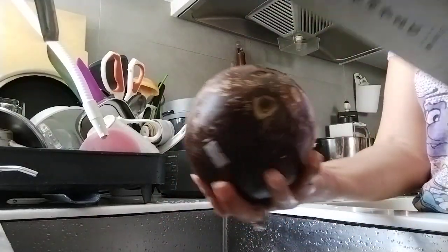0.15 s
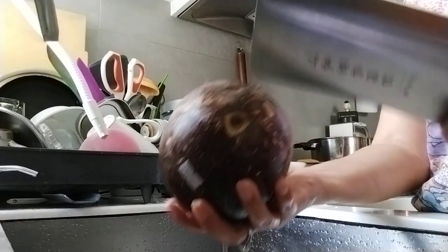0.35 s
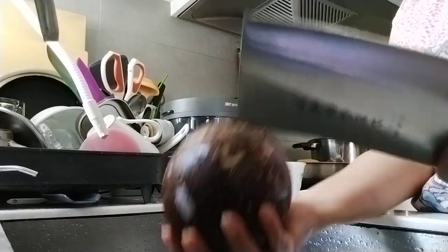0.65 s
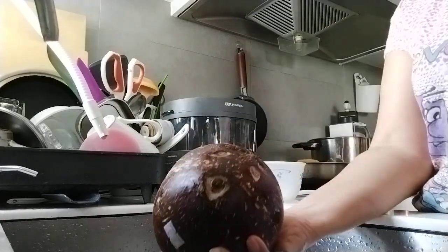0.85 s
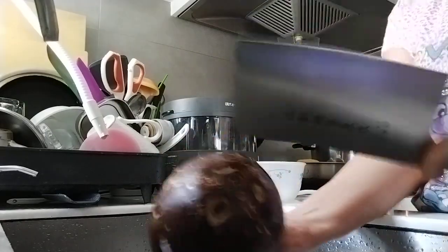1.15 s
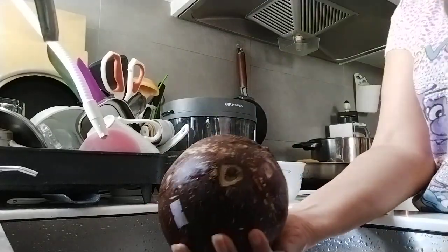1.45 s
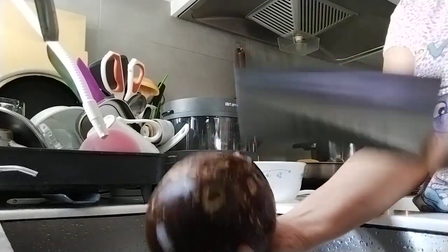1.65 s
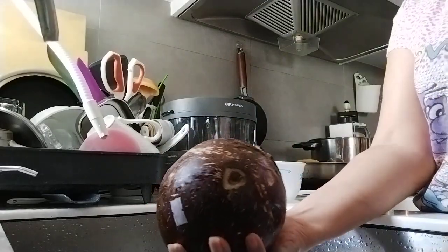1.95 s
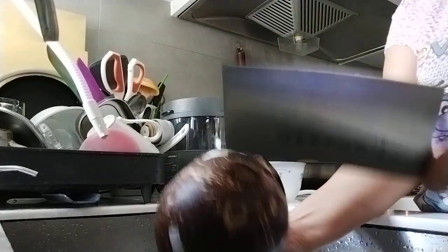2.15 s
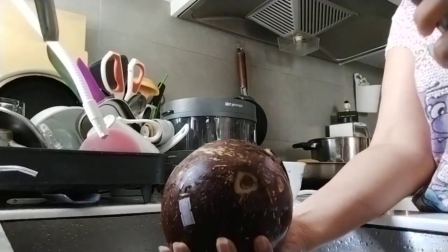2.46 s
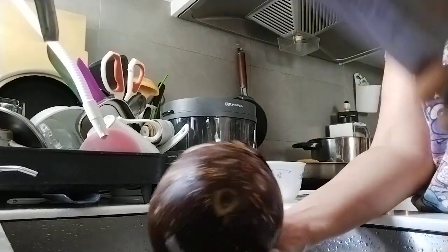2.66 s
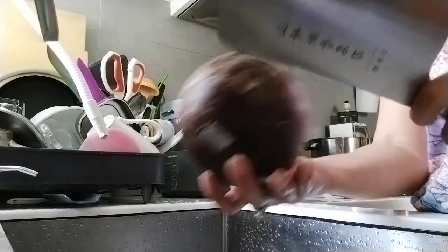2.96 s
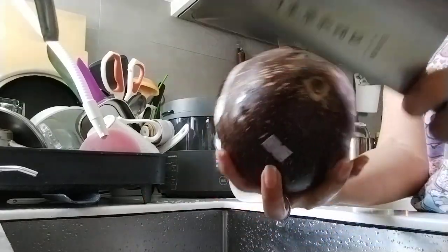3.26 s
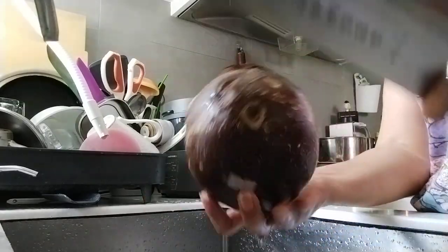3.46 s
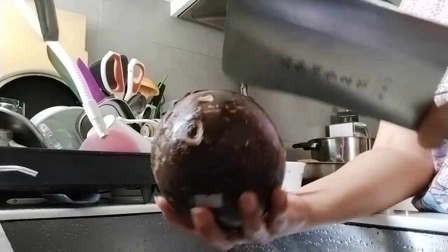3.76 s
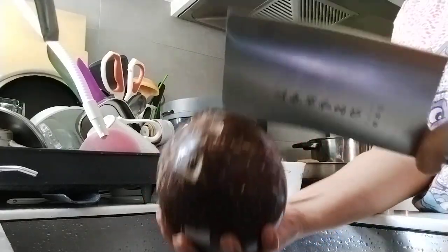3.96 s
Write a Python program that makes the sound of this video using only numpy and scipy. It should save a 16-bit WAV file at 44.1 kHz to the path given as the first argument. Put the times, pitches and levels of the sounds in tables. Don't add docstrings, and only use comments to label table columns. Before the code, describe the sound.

A steel cleaver whacks a hard hollow coconut eight times in a small tiled kitchen, each crack leaving a wavering metallic ring.

```python
import sys
import numpy as np
from scipy import signal
from scipy.fft import rfft, irfft, next_fast_len
from scipy.io import wavfile
from scipy.ndimage import uniform_filter1d

SR = 44100
rng = np.random.default_rng(int(sys.argv[2]) if len(sys.argv) > 2 else 0)


def output_pcm(signal):
    pcm = np.clip(np.atleast_2d(signal).T, -1, 1) * 32767
    wavfile.write(sys.argv[1], SR, np.round(pcm).astype(np.int16))


def decibels_to_gain(level_db):
    exponent = np.asarray(level_db, float) / 20
    return 10 ** exponent


N = 181251
LENGTH = SR * 3 // 4


def unit(x):
    return x / np.sqrt(np.mean(x ** 2) + 1e-20)


def along(points, hz):
    f, v = np.transpose(points)
    return np.interp(np.log(hz + 1), np.log(f + 1), v)


def filtered(x, response):
    m = next_fast_len(x.shape[-1] + 4096)
    spectrum = rfft(x, m) * response(np.fft.rfftfreq(m, 1 / SR))
    return irfft(spectrum, m)[..., :x.shape[-1]]


def add(out, x, s):
    i = round(s * SR)
    out[:, i:i + x.shape[1]] += x[:, :N - i]


def sides(pan_db):
    return decibels_to_gain(np.array([pan_db / 2, -pan_db / 2]))


def two_ports(one, other, plus, minus):
    return np.array([one + plus * other, one - minus * other])


def mode(hz, db, t60, attack=0.0023, flutter_db=0):
    t = np.arange(min(LENGTH, int(t60 * SR))) / SR
    turn = rng.normal(0, 1) * min(hz / 1500, 1.5) * np.array([[.5], [-.5]])
    knots = rng.standard_normal((2, 40))
    flutter = np.array([np.interp(35 * t, np.arange(k.size), k) for k in knots])
    level = decibels_to_gain(db - 60 * t / t60 + flutter_db * flutter) * (1 - np.exp(-t / attack))
    x = level * np.sin(2 * np.pi * hz * t + turn)
    return np.pad(x, ((0, 0), (0, LENGTH - len(t))))


def crack(db, colour, t60, lift_db=0):
    t = np.arange(SR // 8) / SR

    def gain(hz):
        return decibels_to_gain(along(colour, hz) + lift_db * along([(5000, 0), (14000, 1)], hz))

    one, other = filtered(rng.standard_normal((2, len(t))), gain)
    envelope = decibels_to_gain(db - 60 * t / t60) * (1 - np.exp(-t / 0.00038))
    x = envelope * unit(two_ports(one, other, 1.07, 1.15))
    return np.pad(x, ((0, 0), (0, LENGTH - len(t))))


# pitch_hz, level_db (per Hz)
CRACK_COLOUR = [(410, -11), (700, -5), (1810, -29), (2630, -16), (3200, -14.5), (6450, -23.5), (7370, -29),
                (8750, -23), (14800, -29.5), (16500, -35)]


def snap(db, mid_crack_db, lift_db):
    bite = crack(db + 11.5, CRACK_COLOUR, 0.0043, lift_db)
    splinter = crack(db - 2.5, CRACK_COLOUR, 0.039, lift_db)
    low = crack(mid_crack_db - 5.5, [(600, -45.5), (900, -2.5), (2500, 13.5), (4000, -12.0)], 0.018)
    return bite + splinter + low


# pitch_hz, level_db, t60_s
SHELL_MODES = [(190, -3.5, 0.095), (330.8, 2.5, 0.07), (715, -6.5, 0.049), (902, -11, 0.011),
               (1381, -2.5, 0.037), (2560, -14, 0.12)]


def knock(hz, cavity_db, shell_db):
    cavity = mode(hz, cavity_db - 1.5, 0.12, 0.0007) + mode(hz * 1.06, cavity_db - 2.5, 0.087, 0.0018)
    cavity = cavity + mode(hz * .87, cavity_db - 9.0, 0.15, 0.0038)
    tap = mode(hz * 1.295, cavity_db + 1, 0.0064, 0.00038)
    shell = sum(mode(f, shell_db + db + rng.normal(0, 0.98), t60, 0.003) for f, db, t60 in SHELL_MODES)
    return cavity + tap + shell


# pitch_hz, t60_s
SHORT_MODES = [(6277, .36), (8505, 0.39), (11623, 0.18)]
# pitch_hz, level_db (re crack), t60_s
FAINT_MODES = [(2330, -18, 0.26), (2455, -7, 0.6), (3300, -4.5, 0.2), (3430, -14.5, 0.42),
               (4192, -14, 0.54), (6840, -15.5, 0.34), (7050, -22, 0.15)]


def shimmer(crack_db, levels_db):
    steel = sum(mode(hz, db, t60, 0.007, flutter_db=6) for (hz, t60), db in zip(SHORT_MODES, levels_db))
    faint_db = crack_db - 19.5 + 0.45 * (levels_db[0] + 38)
    for hz, db, t60 in FAINT_MODES:
        scatter_db = rng.normal(0, 2)
        steel = steel + mode(hz, faint_db + db + scatter_db, t60, flutter_db=6)
    return steel


def evened(x):
    power = uniform_filter1d(np.abs(rfft(x)) ** 2, size=300, axis=1)
    pulse = np.roll(irfft(np.sqrt(np.abs(power)), x.shape[1]), 100, axis=1)
    return pulse * (np.arange(x.shape[1]) < 1000)


def without_deep_bass(x):
    return filtered(x, lambda hz: (1j * hz / (110 + 1j * hz)) ** 2)


# start_s, crack_db, cavity_hz, cavity_db, duck_db (gain control)
BLOWS = [
    (0.3594, -9.5, 458, -34, -2.5),
    (0.7299, -11.5, 444.5, -21, 2),
    (1.2175, -8.5, 491.6, -22.5, 10),
    (1.691, -6, 579.2, -11, 13),
    (2.2094, -5.5, 551, -21, 10),
    (3.0732, -12, 561.7, -18.5, 0.5),
    (3.6295, -17.5, 558.6, -19, -3.2),
    (4.0147, -12, 548, -18, 1.5),
]
# mid_crack_db, shell_db, crack_pan_db (L-R), shell_pan_db (L-R), wet_db
PORTS = [(-19, -31.5, 2.5, 4.5, -3.5), (-5.5, -24.5, 4, -1, -6), (-6, -30, -4.5, 20, -2.5),
         (-3.5, -30.5, 3.5, 13.5, -9), (-6.5, -50.5, -11, 17.5, -4), (-12.5, -31.5, -2.5, 10.5, -7.5),
         (-12.5, -24, -4.5, 3.5, -3), (-11.5, -27.5, 1.5, 2.5, -11.5)]
# first_db, second_db, third_db (short modes), treble_lift_db (crack)
SHIMMER = [(-49.5, -46, -46, 9), (-26.5, -35.5, -30, 6), (-32.5, -49, -41.5, 14.5), (-46, -40.5, -41, 13),
           (-22, -27.5, -35.5, 9), (-57, -54, -52, 0), (-39.5, -56.5, -44, -2.5), (-40, -64, -61, 10.5)]


def blows():
    out, t = np.zeros((2, N)), np.arange(LENGTH) / SR
    late = 1 / (1 + np.exp(-(t - .016) / 0.0057))
    for (s, db, hz, cavity_db, duck_db), port, (*steel_db, lift_db) in zip(BLOWS, PORTS, SHIMMER):
        mid_crack_db, shell_db, pan_db, shell_pan_db, wet_db = port
        split = snap(db, mid_crack_db, lift_db) * sides(pan_db)[:, None]
        body = knock(hz, cavity_db + 6.5, shell_db + 8.5) * sides(shell_pan_db)[:, None]
        lag_s = 0.0001722 * max(duck_db, 0)
        body = np.roll(body, int(lag_s * SR), axis=1)
        steel = shimmer(db, steel_db)
        wet = kitchen(evened(split) * decibels_to_gain(-0.5) + body + decibels_to_gain(-9.0) * steel)
        wet = decibels_to_gain(wet_db + duck_db) * late ** 0.054 * wet
        gain = decibels_to_gain(-duck_db * late * np.clip(1 - t / 0.15, 0, 1))
        add(out, (split + body + steel + wet) * gain, s)
    return without_deep_bass(out)


# start_s, crack_db, cavity_hz, cavity_db, shell_db
BOUNCES = [
    (0.3935, -39, 594, -48, -35.5),
    (3.1276, -20, 546.3, -12.5, -26),
    (3.6706, -6.5, 589.5, -16, -25),
    (3.6881, -28, 547, -21, -37),
]


def bounces():
    out = np.zeros((2, N))
    colour = [(500, -4.5), (1500, -15.5), (3000, 3.5), (5000, -22.5), (12000, -28.5)]
    for s, db, hz, cavity_db, shell_db in BOUNCES:
        hit = crack(db - 10.0, colour, 0.028) + knock(hz, cavity_db, shell_db + 3.5)
        add(out, hit + decibels_to_gain(-16.5) * kitchen(hit), s)
    return without_deep_bass(out)


# time_s, level_db
RING = [
    [(.37, -39.5), (.5, -42), (.62, -46.5), (.72, -47)],
    [(.745, -26.5), (.81, -20), (.89, -22.5), (.98, -35.5), (1.02, -26), (1.085, -41), (1.14, -34),
     (1.2, -33)],
    [(1.235, -36), (1.31, -25.5), (1.39, -32.5), (1.45, -26), (1.53, -39.5), (1.59, -53.5), (1.65, -36)],
    [(1.72, -47), (1.81, -29.5), (1.86, -36.5), (1.91, -33), (1.99, -45.5), (2.03, -37), (2.08, -55),
     (2.12, -43.5), (2.19, -42.5)],
    [(2.225, -28), (2.29, -27), (2.33, -22), (2.38, -14), (2.5, -25.5), (2.62, -28), (2.72, -29),
     (2.81, -24), (3.05, -31.5)],
    [(3.09, -35), (3.17, -34), (3.24, -56), (3.32, -68), (3.42, -87.5)],
    [(3.645, -35.5), (3.71, -37.5), (3.85, -42), (4.0, -50.5)],
    [(4.03, -39.5), (4.11, -71)],
]
# lower_db, upper_db, top_db, swell_db (as the blade leaves the shell)
PARTIALS = [(-26, -38, -54.5, 15.5), (-9, -23.5, -48.5, 7.5), (-9, -44, -30, 16), (-17, -39.5, -45.5, 29.5),
            (-3.5, -15.5, -20, 16), (-40.5, -42.5, -53, -8.5), (-34.5, -53, -60, -2.5),
            (-40.5, -49.5, -56.5, -3)]
# time_s, blade_speed_m_per_s
SWING = [(0, 1.14), (.7, 0.15), (.9, 0.59), (1.1, 1.07), (1.35, 0.64), (1.6, 1.12), (1.85, 0.83),
         (2.1, 1.16), (2.3, 0.49), (2.5, 0.056), (3.05, 0.047), (3.2, 0.23), (4.11, .1)]
# time_s, tilt (0-1)
TILT = [(.5, 0.32), (.63, 0.42), (.72, 0.09), (.88, 0.14), (1.0, 0.69), (1.1, 0.79), (1.22, 0.5), (1.4, .2),
        (1.56, 0.93), (1.68, 0.46), (1.8, 0.63), (2.08, 0.45), (2.21, 0.43), (2.38, 0.26), (2.62, 0.61),
        (2.7, 0.59), (2.8, 0.17), (3.07, .1)]
LONG_HZ = [2837.5, 2700, 4065, 5466]
# t60_s, pan_db (L-R), turned_pan_db (change), turned_shade_db
LONG = [(2, -5.5, 14, 0.5), (0.83, -1.5, -6.5, 22), (1.28, -1, 7, 22.5), (0.77, 1, 6.5, 8.5)]
LEAD = [(1.19, -6, 0.62), (4, -4, .6), (-2.5, 2, 1.2), (1.5, -1, 0.72)]


def blade():
    out, clock = np.zeros((2, N)), np.arange(N) / SR
    starts = [row[0] for row in BLOWS]
    ends = starts[1:] + [starts[-1] + .4]
    for rows, (*others_db, swell_db), begin, end in zip(RING, PARTIALS, starts, ends):
        on = (clock >= begin) & (clock < end)
        t, age = clock[on], clock[on] - begin
        speed = np.interp(t, *np.transpose(SWING))
        tilt = uniform_filter1d(np.interp(t, *np.transpose(TILT)), size=2000)
        heading_back = np.tanh((t - end + 0.141) / 0.024)
        travel = np.cumsum(speed * heading_back) / SR / 343
        swell = -swell_db * np.clip(1 - age / 0.13, 0, 1) ** 2
        stop = np.clip((end - t) / 0.0063, 0, 1)
        levels = [np.interp(t, *np.transpose(rows))]
        levels += [db + swell - 60 * age / t60 for db, (t60, *_) in zip(others_db, LONG[1:])]
        for hz, (_, pan_db, turn_db, shade_db), (lead, turn, walls), db in zip(LONG_HZ, LONG, LEAD, levels):
            level = decibels_to_gain(db - shade_db * tilt) * sides(pan_db + turn_db * tilt)
            heading = rng.uniform(-0.86, 1, (3, 2, 1))
            start = rng.uniform(0, 2 * np.pi, (3, 2, 1))
            paths = np.sin(2 * np.pi * hz * (t + 1.8 * heading * travel) + start).sum(0)
            port_phase = np.array([[.5], [-.5]]) * (lead + turn * tilt)
            direct = np.sin(2 * np.pi * hz * (t + 1.4 * travel) + port_phase)
            ring = direct + walls * np.clip(speed - .07, 0, 1) * paths
            out[:, on] += 1.085 * level * ring * stop
    return out


# start_s, level_db, way (positive push, negative pull)
PUSHES = [
    (.354, -57, 1),
    (.725, -58.5, 1),
    (1.2161, -32, -1.3),
    (1.684, -37, 1),
    (2.2032, -26.5, 1),
    (3.068, -53, 1),
    (3.625, -57, 1),
    (4.010, -53, 1),
]


def pushes():
    air, u = np.zeros((2, N)), np.arange(SR // 8) / SR / .0021
    push = u * u * (3 - u) * np.exp(-u)
    both = sides(-6.0)[:, None] * [np.roll(push, 130), push]
    for s, db, way in PUSHES:
        add(air, way * decibels_to_gain(db + 6) * both, s)
    return air


# time_s, level_db, length_s
RUSTLES = [(1.574, -41, 0.0061), (1.603, -58, 0.0089), (1.618, -53, 0.025), (2.097, -63, 0.016),
           (3.451, -65.5, 0.012), (3.564, -55.5, 0.013), (3.783, -45.5, 0.0093), (3.845, -51.5, 0.0097)]


def rustles():
    out, t = np.zeros((2, N)), np.arange(SR // 8) / SR
    colour = [(2000, -31.0), (4000, -11), (9000, -3.5), (15000, -1.5)]
    for s, db, length in RUSTLES:
        grains = rng.standard_normal((2, len(t))) * decibels_to_gain(8.5 * rng.standard_normal(len(t)))
        bright = filtered(grains, lambda hz: decibels_to_gain(along(colour, hz)))
        add(out, decibels_to_gain(db) * unit(bright) * np.exp(-((t - .05) / length) ** 2), s - .05)
    return out


# pitch_hz, t60_s
KITCHEN = [(150, 0.36), (500, 0.35), (2000, 0.45), (6000, 0.48), (10000, 0.41), (16000, 0.33)]
# pitch_hz, level_db
WALLS = [(150, -1.5), (500, 5.9), (1500, 0.54), (4000, 4), (9000, 3.5), (15000, -3)]


def kitchen(x):
    one, other = rng.standard_normal((2, LENGTH))
    hz, t, z = signal.stft(two_ports(one, other, 1.104, 0.99), SR, nperseg=256)
    low = hz < 900
    z[:, low] = 0.47 * z[:, low] + 0.16 * z[::-1, low]
    fade_db = along(WALLS, hz)[:, None] - 60 * t / along(KITCHEN, hz)[:, None]
    tail = signal.istft(z * decibels_to_gain(fade_db), SR, nperseg=256)[1]
    tail = np.pad(tail / np.linalg.norm(tail[0]), ((0, 0), (130, 0)))
    return signal.fftconvolve(x.mean(0)[None], tail, axes=1)[:, :LENGTH]


# pitch_hz, level_db (per Hz)
HUM = [(15, -85), (25, -45), (124, -1.5), (182, -6.5), (208, -11), (304, -9), (422, -11), (538, -11.5),
       (651, -18), (766, -15.5), (1510, -28), (3320, -30), (15200, -35), (16500, -34.5)]
# pitch_hz, likeness (-1 to 1)
ALIKE = [(60, 0.75), (180, 1), (550, 0.49), (1650, 0.13), (4970, -0.41), (15000, -0.71)]
# level_db, t60_s
EARLIER = (-50.5, 0.46)


def room_tone():
    def mid_side(hz):
        turn = np.arccos(np.clip(along(ALIKE, hz), -1, 1)) / 2
        return decibels_to_gain(along(HUM, hz)) * [np.cos(turn), np.sin(turn)]

    mid, side = filtered(rng.standard_normal((2, N)), mid_side)
    hum = decibels_to_gain(-56) * unit(np.array([mid + side, mid - side]))
    colour = [(150, -10.5), (400, 15.5), (1500, -4.5), (9000, 1.0), (16000, -17)]
    tail = filtered(rng.standard_normal((2, N)), lambda hz: decibels_to_gain(along(colour, hz)))
    fading = decibels_to_gain(EARLIER[0] - 60 * np.arange(N) / SR / EARLIER[1])
    return hum + fading * unit(tail)


def scene():
    return blows() + bounces() + blade() + pushes() + rustles() + room_tone()


def thinned(x, share):
    hz, t, z = signal.stft(x, SR, nperseg=1024)
    power = np.abs(z) ** 2
    total = power.sum((0, 1))
    steady = np.maximum(np.roll(total, -1), total) < 4 * np.roll(total, 1)
    busy = np.clip(np.log10(total / total.min()) / 2, .4, 1)
    held = uniform_filter1d(uniform_filter1d(power, size=2, axis=2), size=2, axis=1).mean(0)
    below = held < share * busy * uniform_filter1d(held, size=24, axis=0)
    weak = below & (hz[:, None] > 2300) & steady
    return signal.istft(np.where(weak, .05 * z, z), SR, nperseg=1024)[1][:, :N]


def top_cut(x):
    return signal.sosfilt(signal.butter(12, 16960, fs=SR, output="sos"), x)


def record(dry):
    clipped = dry / (1 + np.abs(dry / .78) ** 4) ** (1 / 4)
    limited = filtered(clipped, lambda hz: decibels_to_gain(along([(15700, 1.0), (16100, -21), (17000, -43.0)], hz)))
    sparse = thinned(limited, share=.85)
    return top_cut(sparse)


dry = scene()
out = record(dry)
output_pcm(out)
```